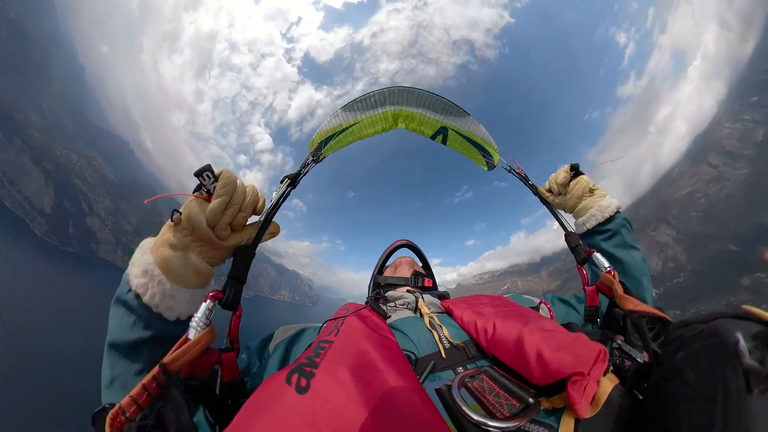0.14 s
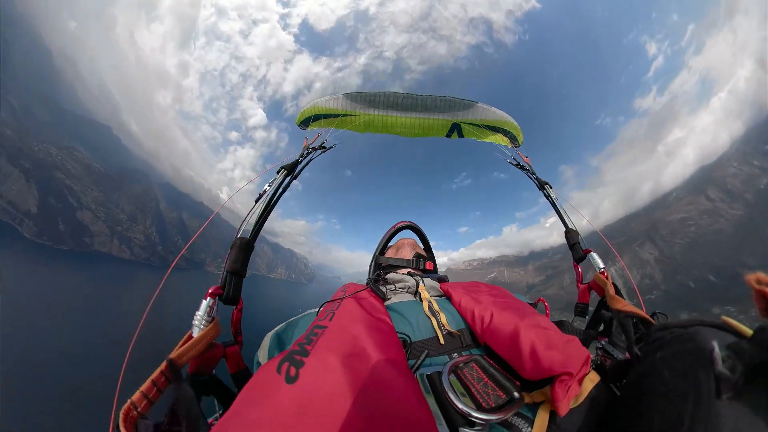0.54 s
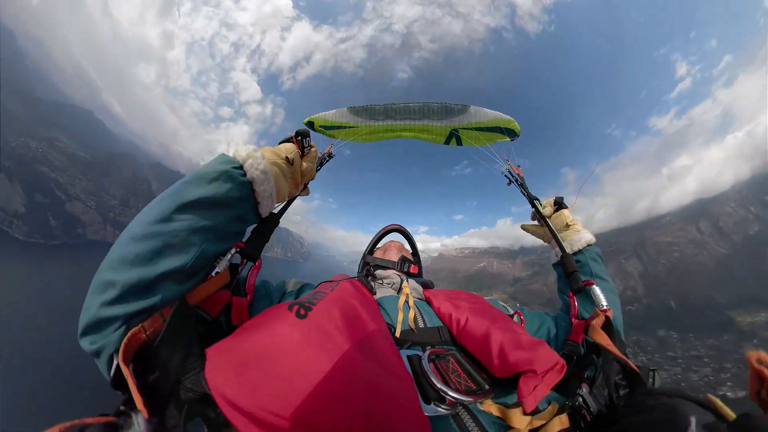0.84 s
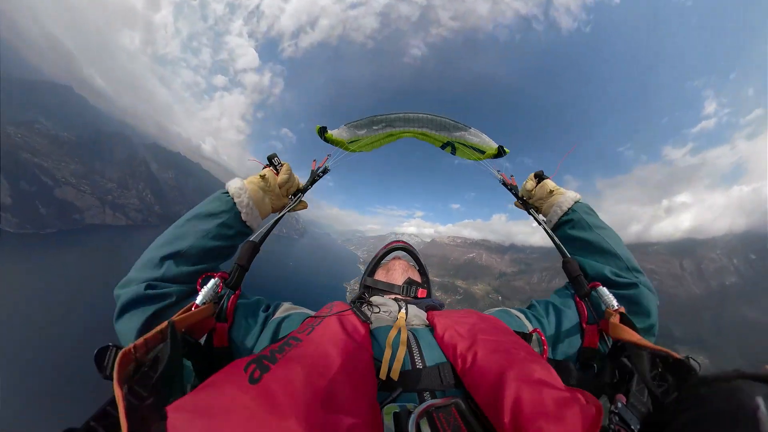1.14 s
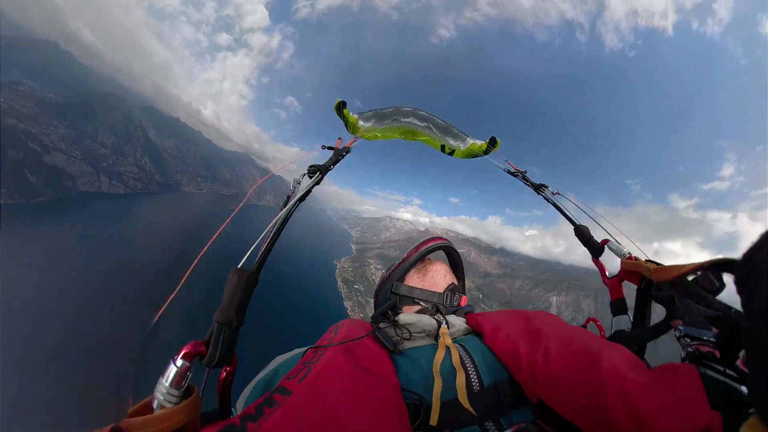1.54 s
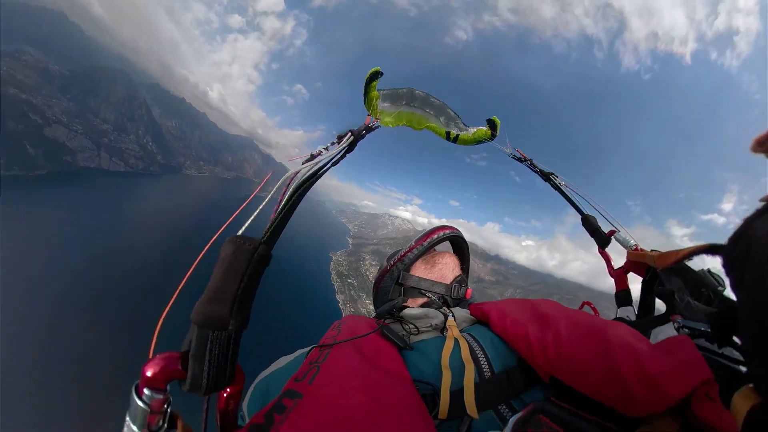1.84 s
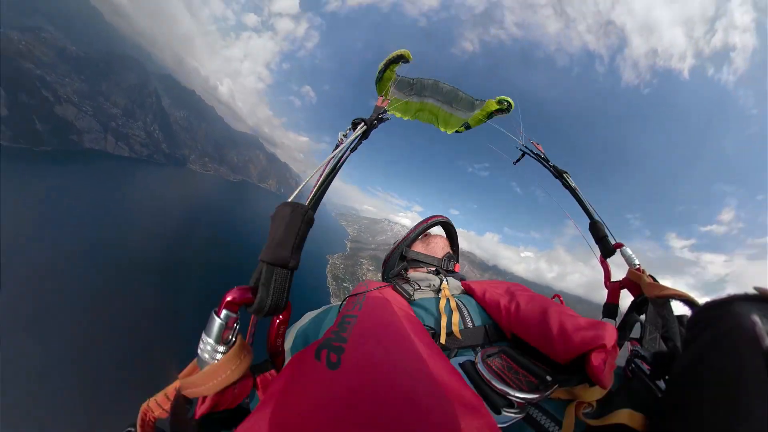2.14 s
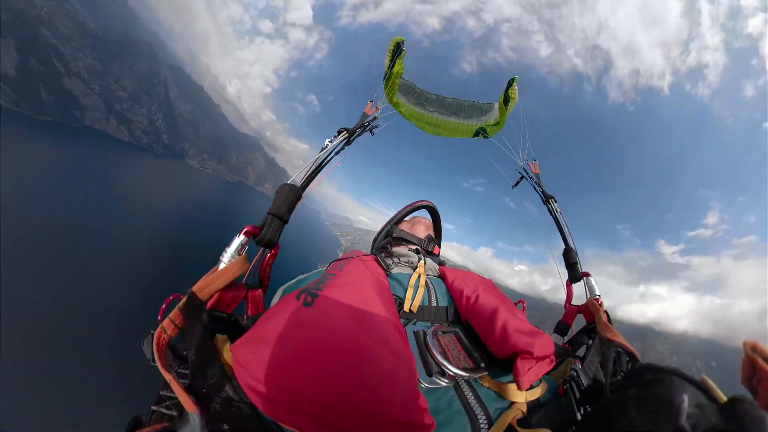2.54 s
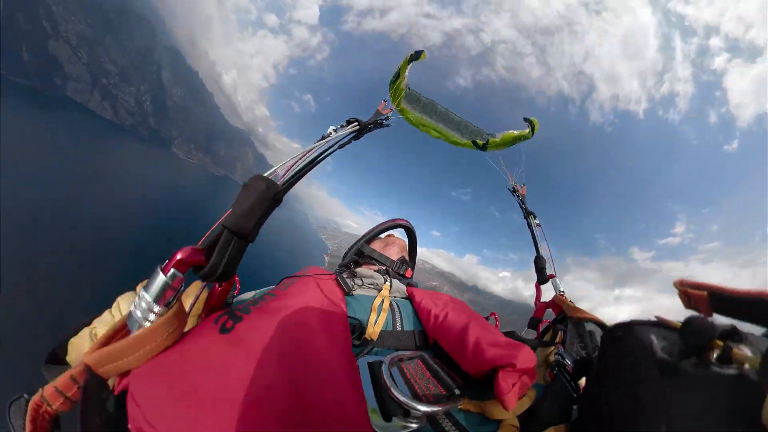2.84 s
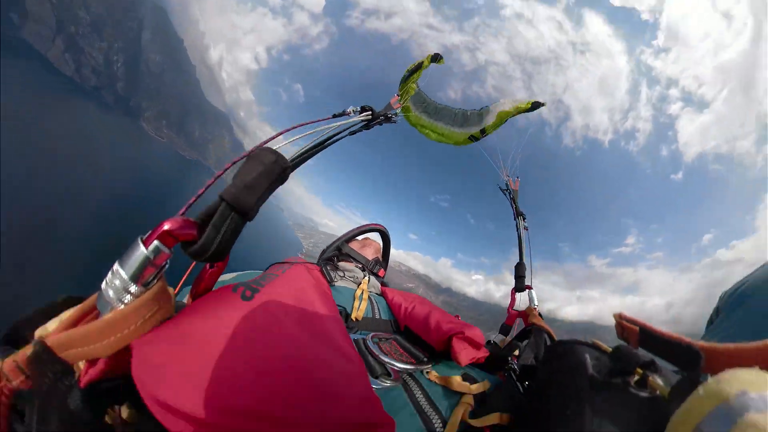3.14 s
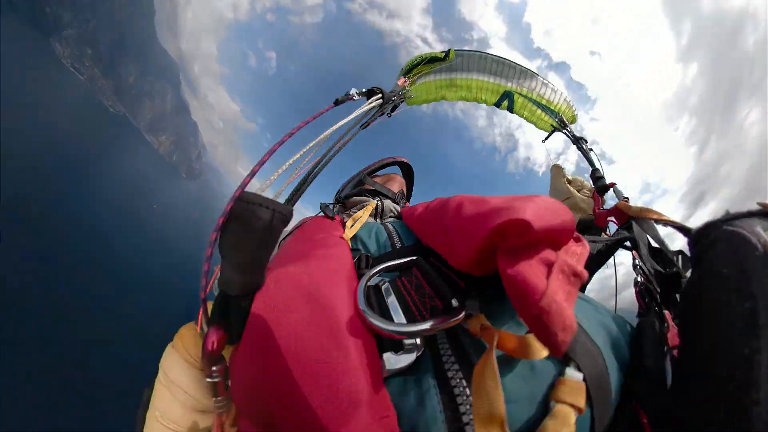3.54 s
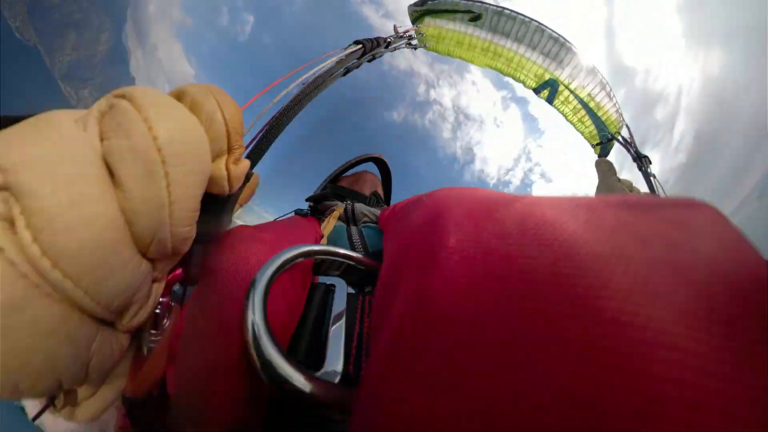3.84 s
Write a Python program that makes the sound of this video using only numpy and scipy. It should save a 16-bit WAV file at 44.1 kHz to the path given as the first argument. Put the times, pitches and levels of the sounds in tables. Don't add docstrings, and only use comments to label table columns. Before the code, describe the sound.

Deep wind rumble and thumps on the microphone, growing rougher, with cloth slaps and hard knocks

```python
import sys
import numpy as np
from scipy import signal
from scipy.fft import rfft, irfft
from scipy.io import wavfile
from scipy.ndimage import uniform_filter1d

SR = 44100
rng = np.random.default_rng(int(sys.argv[2]) if len(sys.argv) > 2 else 0)


def rack_gain(trim_db):
    fader = np.asarray(trim_db, float)
    return 10 ** (fader / 20)


def wav_record(signal):
    frames = np.transpose(np.atleast_2d(signal))
    bounded = np.clip(frames, -1, 1)
    quanta = np.round(bounded * 32767).astype(np.int16)
    wavfile.write(sys.argv[1], SR, quanta)


N = 176400

# time_s, level_db
GUST_LEVEL = [(0, -22), (.34, -28), (.49, -36.5), (.99, -24.5), (1.2, -34), (1.57, -26), (1.63, -17.5),
              (1.85, -14.5), (2.2, -16), (2.52, -18), (2.7, -24.5), (2.86, -13), (2.95, -23), (3.21, -13),
              (3.27, -20.5), (3.4, -11.5), (3.7, -22.5), (4, -14)]
# time_s, level_db
EDDY_LEVEL = [(0, -15), (.08, -36), (.32, -30), (.58, -38), (.7, -30), (.97, -30.5), (1.2, -41),
              (1.56, -30.5), (1.62, -14.5), (1.69, -36.5), (1.77, -18.5), (2.05, -25), (2.3, -32),
              (2.66, -39.5), (2.86, -25), (2.95, -47), (3.1, -23), (3.29, -34)]
# time_s, level_db
LATE_EDDY_LEVEL = [(3.29, -34), (3.39, -19), (3.5, -20.5), (3.57, -16), (3.61, -36), (3.66, -33), (3.76, -25.5),
                   (3.82, -37), (4, -27)]
# time_s, rush_level_db, crackle_share_db
RUSH_LEVEL = [(0, -53, 11.5), (.32, -41.5, -50), (.62, -50, -13), (.66, -42, 6.5), (.9, -37.5, -23.5),
              (1.4, -47.5, -1.5), (1.76, -44, -1), (1.84, -36.5, 5.5), (2.02, -41.5, 7), (2.07, -54.5, 8),
              (2.62, -59.5, 1.5), (2.78, -44.5, -32.5), (2.96, -59, -17.5), (3.06, -46, -4.5),
              (3.3, -49, -11), (3.4, -35.5, -1.5), (3.5, -49, 5.5), (4, -54.5, -12)]
# time_s, level_db
TREBLE_LEVEL = [(0, -94.5), (.3, -68), (.62, -74.5), (.68, -58), (.85, -63), (1.3, -68), (1.75, -65.5),
                (1.84, -74.5), (1.87, -110)]

# pitch_hz, level_db (per Hz)
SWING_TONE = [(12, 8), (27, 9), (98, -6.5), (156, -17), (220, -40.5)]
# pitch_hz, level_db (per Hz)
TUMBLE_TONE = [(80, -6.5), (157, 1), (270, -12.5), (340, -19), (700, -27)]
# pitch_hz, level_db (per Hz)
AIR_TONE = [(350, 1), (900, -7.5), (1250, -12.5), (2000, -20), (2500, -15), (3500, -22), (4300, -29),
            (7500, -44.5)]
# pitch_hz, level_db (per Hz)
HISS_TONE = [(7000, -31.5), (10000, -17), (11200, -18.5), (12100, -3.5), (13200, -14.5), (15200, -15)]
# pitch_hz, level_db (per Hz)
ROAR_TONE = [(170, -4.5), (270, -6.5), (450, -11), (800, -23.5)]
# pitch_hz, level_db (per Hz)
HOLLOW_TONE = [(350, -5), (600, -4), (950, 7.5), (1250, -22)]
# pitch_hz, level_db (per Hz)
CRACKLE_TONE = [(300, 3.5), (1000, -4.5), (1300, -23.5), (2500, -15.5), (3600, -42), (5000, -37.5),
                (7000, -81.5)]
# pitch_hz, level_db (per Hz)
SLAP_TONE = [(700, 2), (1000, 0), (1400, -2.5), (3400, -18), (5500, -33.5)]
# pitch_hz, level_db
MOUNT_TONE = [(300, 2), (900, 11.5), (2500, -11.5), (3600, -13), (5000, -23.5), (7500, -41)]
# pitch_hz, width_hz, level_db
HOUSING_RINGS = [(950, 102, -7), (1690, 120, -7.5)]

# start_s, peak_db
TICKS = [
    (.434, -50),
    (.668, -53),
    (.755, -56),
    (.836, -55),
    (.871, -56),
    (1.26, -60),
]
# start_s, peak_db
SLAPS = [(0.453, -38), (0.749, -37), (1.615, -36), (1.76, -34), (1.78, -25), (1.804, -29), (1.833, -21.5),
         (1.848, -21.5), (1.868, -20.5), (1.894, -25.5), (1.931, -35), (1.949, -40), (1.974, -31),
         (1.992, -22.5), (2.034, -27.5), (2.279, -44), (2.301, -46), (2.364, -48), (3.038, -29.5),
         (3.074, -37), (3.109, -40), (3.439, -34.5), (3.464, -34), (3.525, -48), (3.584, -43), (3.788, -48),
         (2.084, -46.5), (2.198, -51), (2.38, -42), (3.25, -44), (3.726, -37), (3.964, -41), (.643, -40),
         (2.6, -51), (3.415, -31.5)]
# start_s, peak_db, pitch_hz, length_s
KNOCKS = [(0.311, -43, 1234, 0.00084), (0.317, -29.5, 3240, 0.015), (0.426, -26.5, 700, 0.0026),
          (0.593, -41.5, 2870, 0.0025), (0.664, -31, 1130, 0.0025), (0.927, -28.5, 2430, 0.0019),
          (1.484, -34, 2030, 0.0042), (1.638, -30, 2220, 0.0037), (1.712, -31.5, 1410, 0.00087),
          (2.13, -35, 1190, 0.0018), (2.181, -35.5, 1360, 0.0048), (2.254, -39.5, 1204, 0.036),
          (2.325, -34.5, 1480, 0.0018), (2.438, -32, 1050, 0.0029), (2.488, -34, 830, 0.0071),
          (3.022, -41.5, 1440, 0.0015), (3.046, -30.5, 2270, 0.0015), (3.141, -36.5, 1700, 0.0038),
          (3.212, -25, 2260, 0.0017), (3.223, -27.5, 2670, 0.0012), (3.322, -29.5, 1710, 0.011),
          (3.368, -30, 3470, .0015), (3.389, -21, 1060, 0.013), (3.4062, -19, 3300, 0.00088),
          (3.545, -36.5, 1600, 0.0035), (3.5645, -18, 2520, 0.0011), (3.648, -34.5, 1700, 0.0047),
          (3.674, -36.5, 1400, 0.0033), (3.9236, -20, 2430, 0.00093)]
# start_s, peak_db, pitch_hz
JOLTS = [(0.424, -25, 340), (0.452, -31.5, 393), (0.642, -36, 312), (0.674, -21, 262), (0.711, -23, 273),
         (0.801, -22, 258), (0.824, -26, 250), (0.84, -23.5, 269), (0.887, -29, 425), (1.045, -32, 247),
         (1.601, -24, 250), (1.616, -20, 255), (1.702, -22, 250), (1.758, -25, 297), (1.794, -30, 283),
         (1.834, -28.5, 363), (1.994, -21.5, 277), (2.031, -21, 257), (2.083, -38, 246), (2.178, -35, 348),
         (2.44, -30, 308), (2.487, -29, 253), (2.795, -28, 263), (3.15, -27.5, 258), (3.213, -36, 249),
         (3.326, -24, 258), (3.394, -14, 255), (3.526, -14.5, 250), (3.565, -21.5, 250), (3.649, -23, 250),
         (3.672, -27, 251), (3.725, -19.5, 266), (3.771, -39, 347), (3.92, -26, 253), (3.964, -24, 250)]
# start_s, peak_db, pitch_hz
THUMPS = [(0.004, -27.5, 184), (0.318, -18.5, 119), (0.421, -23, 134), (0.669, -23, 265), (0.75, -19, 267),
          (0.77, -18, 285), (1.043, -23.5, 154), (1.594, -16, 100), (1.699, -23, 91.5), (1.754, -14, 91.1),
          (2.045, -14.5, 116.5), (2.164, -12.5, 103.3), (2.87, -29.5, 120), (3.036, -20, 107),
          (3.36, -9, 85.8), (3.394, -14, 125), (3.52, -4, 160), (3.563, -9, 156.5), (3.646, -15.5, 118.6),
          (3.723, -15, 164.6), (0.822, -19.5, 103), (.95, -21, 96.7), (1.89, -11, 77), (1.972, -17, 87.4),
          (2.085, -13, 91.6), (2.125, -11.5, 83), (2.229, -20.5, 83.4), (2.748, -17.5, 114),
          (3.188, -17, 94.6), (3.437, -10, 109), (3.77, -17.5, 51.7), (3.916, -23, 92),
          (3.962, -20.5, 140.4)]

BLOCK_S, SHUT_FROM_S, SHUT_TO_S = 256 / 48000, 1.7915, 2.01


def evened(x):
    return x / np.sqrt(np.mean(x ** 2) + 1e-20)


def read(points, hz):
    f, db = np.transpose(points)
    f = np.r_[f[0] / 2, f, f[-1] * 1.3, f[-1] * 4]
    db = np.r_[db[0] - 30, db, db[-1] - 25, db[-1] - 90]
    return np.interp(np.log(hz + 1), np.log(f + 1), db)


def curve(rows, column=1):
    rows = np.array(rows)
    return np.interp(np.arange(N) / SR, rows[:, 0], rows[:, column])


def add(mix, start_s, sound):
    part = mix[round(start_s * SR):][:len(sound)]
    part += sound[:len(part)]


def colour(x, points):
    hz = np.fft.rfftfreq(len(x), 1 / SR)
    return irfft(rfft(x) * rack_gain(read(points, hz)), len(x))


def lumps(per_s):
    smoother = np.hanning(round(SR / per_s / 1.5))
    return evened(signal.oaconvolve(rng.standard_normal(N), smoother, "same"))


def ring(x, hz, width_hz):
    r = np.exp(-np.pi * width_hz / SR)
    return signal.lfilter([1 - r, 0, r - 1], [1, -2 * r * np.cos(2 * np.pi * hz / SR), r * r], x)


def wind(points, level_db, lumpy_db):
    noise = colour(rng.standard_normal(N), points) * rack_gain(lumpy_db)
    return rack_gain(level_db) * evened(noise)


def puffs(events, rise_s, points):
    loudness, t = np.zeros(N), np.arange(900) / SR
    for start_s, db in events:
        add(loudness, start_s, rack_gain(db) * t / rise_s * np.exp(1 - t / rise_s))
    return 0.5 * loudness * evened(colour(rng.standard_normal(N), points))


def self_noise():
    tone = [(3000, -6.0), (6000, -12), (8000, -24), (11500, -29), (13000, -45.5)]
    level_db = -78.5 + 0.35 * (curve(RUSH_LEVEL) + 48)
    return wind(tone, level_db, 1.5 * lumps(60) + 2.4 * lumps(8))


def open_treble(fine):
    hiss = wind(HISS_TONE, curve(TREBLE_LEVEL), 1.0 * lumps(50))
    roar = wind(ROAR_TONE, curve(TREBLE_LEVEL) + 25, 1.8 * fine)
    return hiss + roar


def ticks():
    return puffs(TICKS, 0.002, [(7000, -12), (11000, -7), (13000, 0), (15300, -4)])


def hollow_rush(fine, quick):
    shut = np.clip((np.arange(N) / SR - SHUT_FROM_S) / (SHUT_TO_S - SHUT_FROM_S), 0, 1)
    return shut * wind(HOLLOW_TONE, curve(RUSH_LEVEL) - 4, 5.0 * fine + 3.0 * quick)


def air_rush(fine, quick):
    return wind(AIR_TONE, curve(RUSH_LEVEL) - 1.5, 1.4 * fine + 1.8 * quick)


def crackle():
    snaps_per_s, spread_db, fade_s = 240, 3.0, 0.0012
    chance = snaps_per_s / SR * rack_gain(6.0 * lumps(42))
    size = rack_gain(spread_db * np.minimum(rng.exponential(1, N), 3.5))
    snaps = size * (rng.random(N) < chance)
    t = np.arange(1024) / SR
    noise = signal.oaconvolve(snaps, np.exp(-t / fade_s))[:N] * rng.standard_normal(N)
    level_db = curve(RUSH_LEVEL) + curve(RUSH_LEVEL, column=2)
    return rack_gain(level_db) * evened(colour(noise, CRACKLE_TONE))


def strap():
    start_s, length_s, peak_db = 0.879, 0.009, -26
    out, u = np.zeros(N), np.arange(0, 1, 1 / SR / length_s)
    hz = 1150 * (1 + 1.5 * u ** 2)
    noise = rng.standard_normal(2000)
    smooth = uniform_filter1d(uniform_filter1d(noise, size=9), size=9)
    rough = 1 + 0.95 * smooth[:len(u)]
    squeak = np.sin(np.pi * u ** 0.79) * rough * np.sin(2 * np.pi * np.cumsum(hz) / SR)
    add(out, start_s, rack_gain(peak_db) * squeak)
    return out


def buckle():
    start_s, pitch_hz, peak_db, fade_60db_s = 3.93, 2330, -54, 0.15
    out, t = np.zeros(N), np.arange(5000) / SR
    loudness = rack_gain(peak_db - 60 * t / fade_60db_s) * np.minimum(t / 0.004, 1)
    add(out, start_s, loudness * np.sin(2 * np.pi * pitch_hz * t))
    return out


def slaps():
    return puffs(SLAPS, 0.0021, SLAP_TONE)


def knocks():
    out, t = np.zeros(N), np.arange(3000) / SR
    for start_s, db, hz, length_s in KNOCKS:
        fade = np.exp(-t / max(length_s, 5e-4)) + rack_gain(-21) * np.exp(-t / 0.009)
        shape = np.minimum(t / 0.00033, 1) * fade
        click = 0.86 * np.exp(-t / 0.00042) * np.sin(2 * np.pi * hz * t)
        rattle = (rng.standard_normal(3000) + click) * shape
        narrow = ring(ring(rattle, hz, 0.28 * hz), hz, hz)
        body = narrow + rack_gain(-9) * ring(rattle, hz, 2 * hz)
        body = colour(np.roll(body, 100), MOUNT_TONE) * signal.windows.tukey(3000, 0.06)
        add(out, start_s - 100 / SR, rack_gain(db) * body / abs(body).max())
    return out


def gear():
    return crackle() + knocks() + slaps() + buckle() + strap()


def in_housing(sound):
    return sound + sum(rack_gain(db) * ring(sound, hz, width_hz) for hz, width_hz, db in HOUSING_RINGS)


def jolts():
    out, cycles = np.zeros(N), 0.7
    for start_s, db, hz in JOLTS:
        u = np.arange(2000) / SR * hz / cycles
        loudness = rack_gain(db + 1.5) * (u * np.exp(1 - u)) ** 1.57
        add(out, start_s + 0.0011, loudness * np.cos(2 * np.pi * cycles * u))
    return out


def thumps():
    out, cycles = np.zeros(N), 1.3
    fade_out = signal.windows.tukey(8000, 0.5)[4000:]
    for start_s, db, hz in THUMPS:
        u = np.arange(4000) / SR * hz / cycles
        loudness = rack_gain(db) * np.e * u * np.exp(-u - 0.12 * u ** 2) * fade_out
        add(out, start_s, loudness * np.sin(2 * np.pi * cycles * u * (1.15 - 0.055 * u)))
    return out


def buffeting(slow, quick):
    gusts = wind(SWING_TONE, curve(GUST_LEVEL), 1.2 * slow + 1.4 * quick)
    eddy_db = curve(EDDY_LEVEL + LATE_EDDY_LEVEL[1:]) - 2.5
    return gusts + wind(TUMBLE_TONE, eddy_db, 2.2 * quick + 0.8 * slow)


def scene():
    slow, quick, fine = lumps(6.2), lumps(15), lumps(60)
    background = self_noise() + open_treble(fine) + ticks() + hollow_rush(fine, quick)
    harness = in_housing(air_rush(fine, quick) + gear())
    pressure = jolts() + thumps() + buffeting(slow, quick)
    return (background + harness + pressure)[None]


def block_starts(from_s, to_s):
    return np.round(np.arange(from_s, to_s, BLOCK_S) * SR).astype(int)


def filter_clicks(dry):
    jumps, faint = np.zeros(N), np.zeros(N)
    at = block_starts(SHUT_FROM_S, SHUT_TO_S)
    jumps[at] = rack_gain(-33) * rng.uniform(0.24, 1, len(at)) * dry[0, at] / 0.35
    idle = block_starts(SHUT_TO_S, N / SR - BLOCK_S)
    faint_db = -60.5 + 8.8 * np.tanh(2 * lumps(18)[idle])
    faint[idle] = rack_gain(faint_db) * rng.uniform(0.2, 1, len(idle)) * dry[0, idle] / 0.11
    shutting = colour(jumps, [(5500, -6), (8000, 0), (11000, -3), (13500, -9)])
    return shutting + colour(faint, [(6000, -4.5), (9000, -3.5), (15300, -2.5)])


def low_pass(x):
    return signal.sosfilt(signal.butter(12, 15350, fs=SR, output="sos"), x)


def record(dry):
    ceiling = 0.46
    mix = ceiling * np.tanh(dry / ceiling) + filter_clicks(dry)
    return low_pass(mix)


dry = scene()
out = record(dry)
wav_record(out)
```